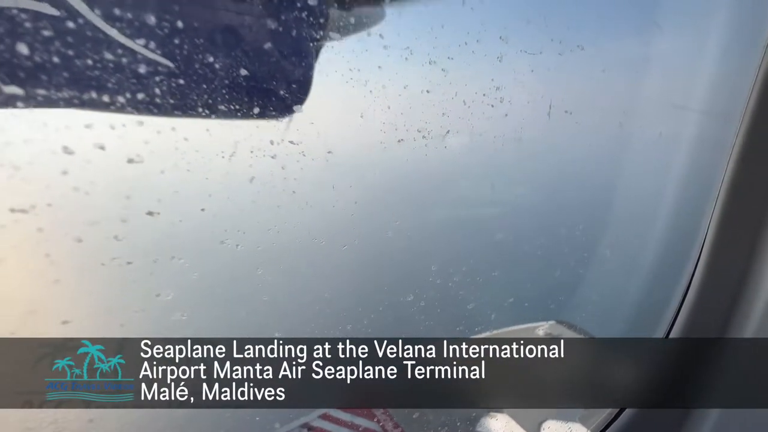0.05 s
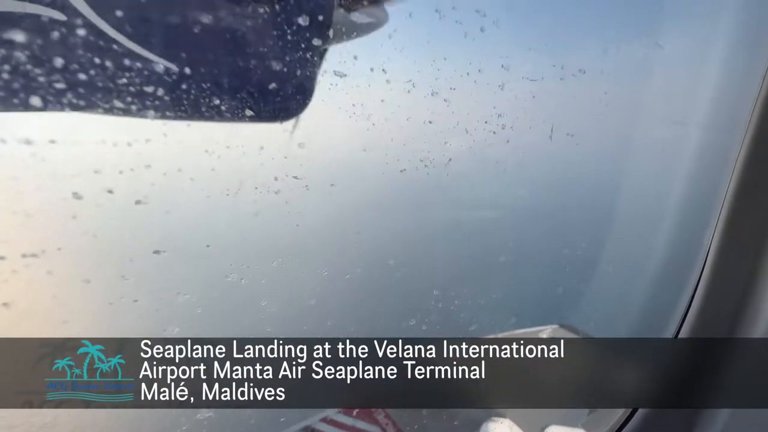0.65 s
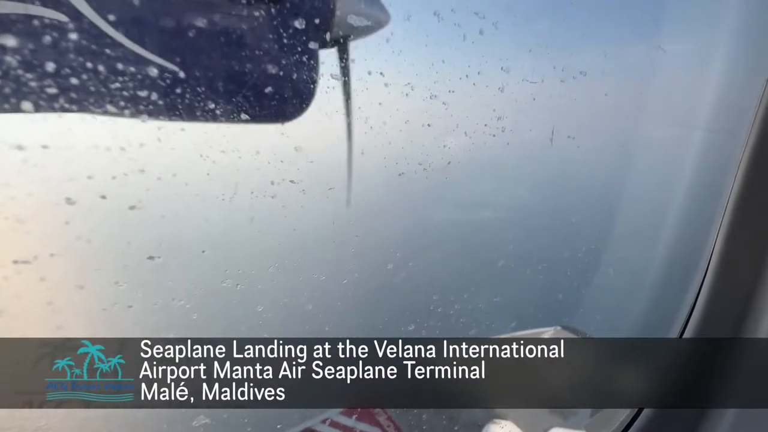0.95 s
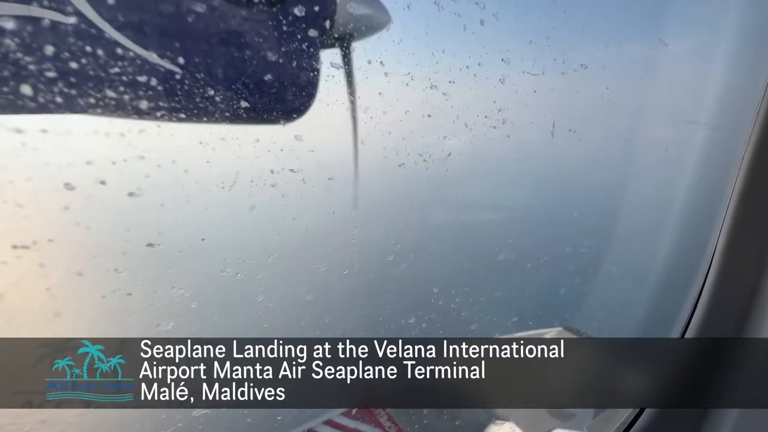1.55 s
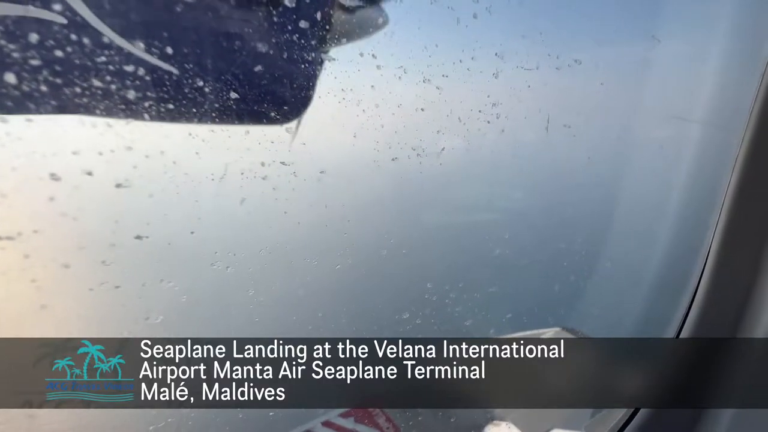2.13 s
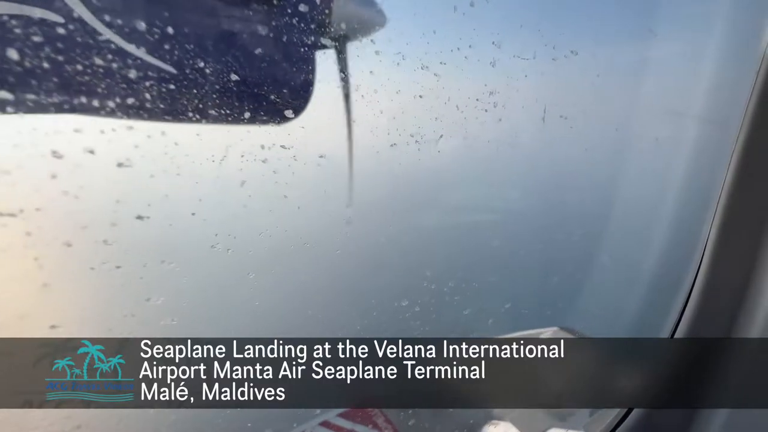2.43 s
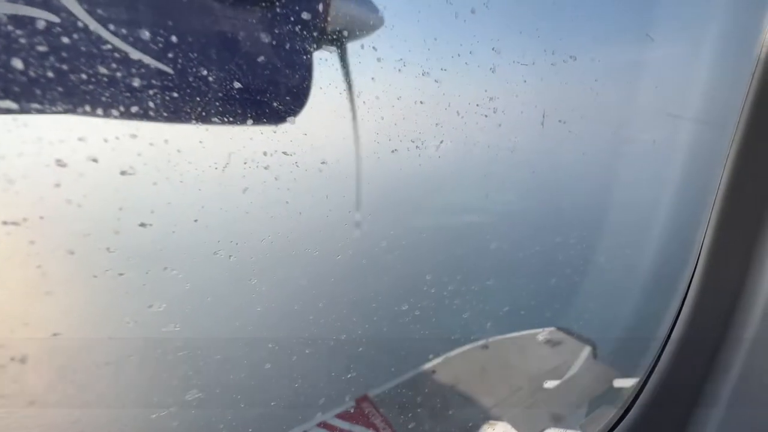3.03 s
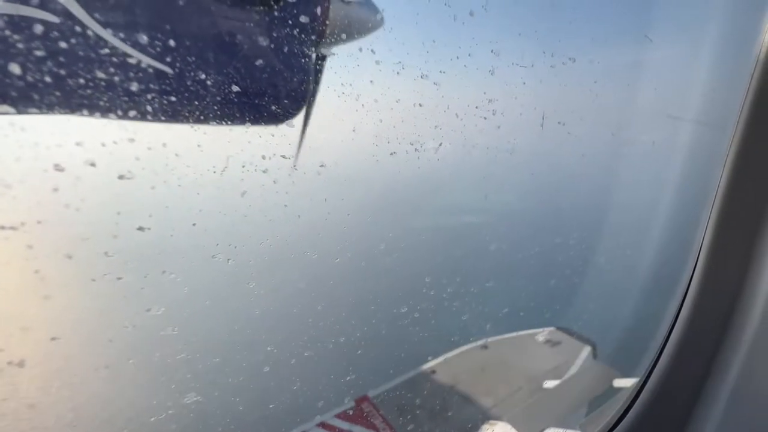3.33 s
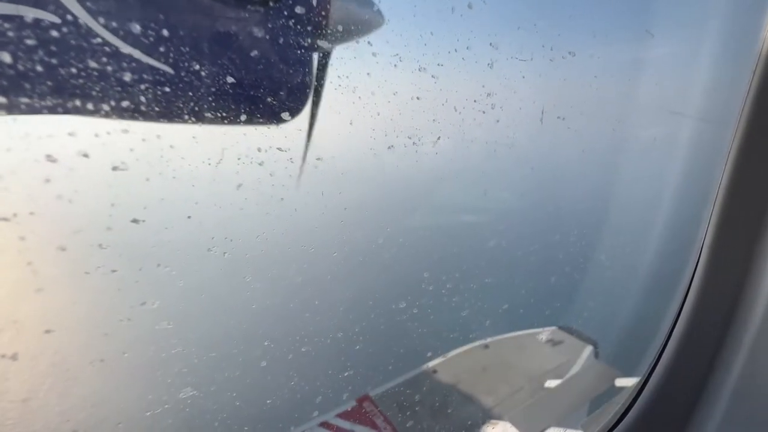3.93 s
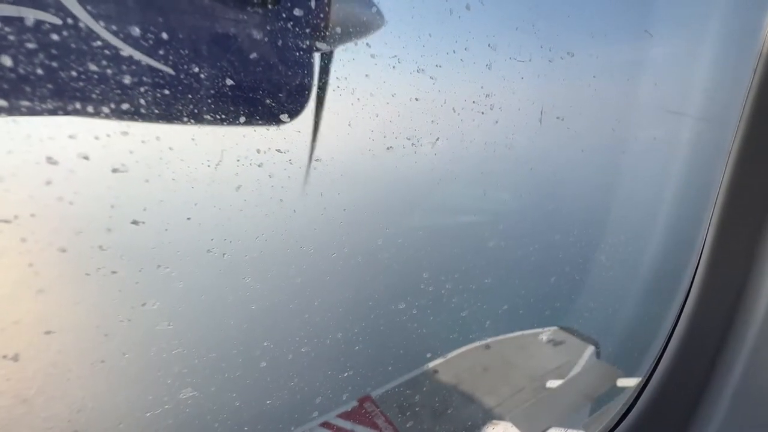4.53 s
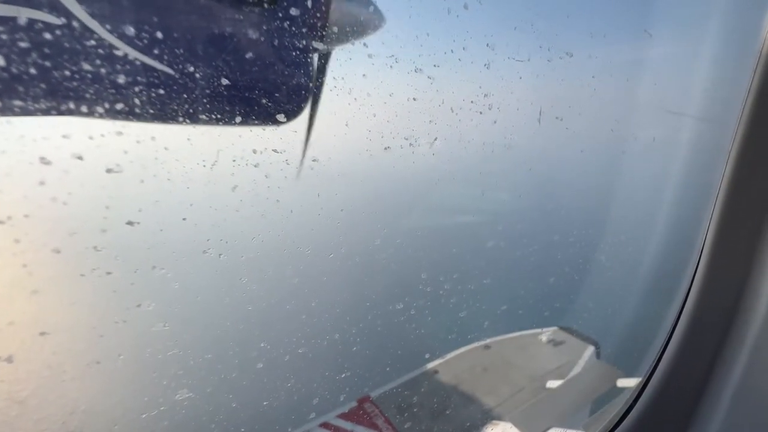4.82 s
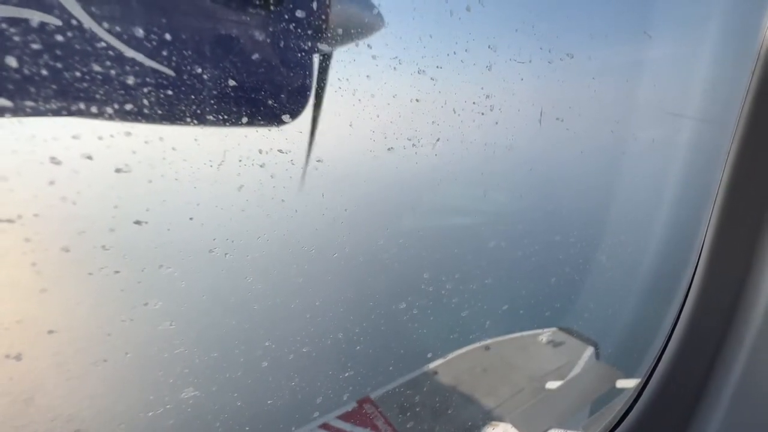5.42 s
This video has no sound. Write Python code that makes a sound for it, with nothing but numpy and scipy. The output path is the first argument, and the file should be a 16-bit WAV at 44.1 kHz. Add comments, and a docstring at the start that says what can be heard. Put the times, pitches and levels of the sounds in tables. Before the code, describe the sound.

Inside a seaplane in flight, close to a window, a deep propeller drone starts loud, its tones slowly swelling and sinking, a little stronger on the left. For the first second and a half, rough air buffets the cabin, short gusts surge against the window and loose trim buzzes in quick shakes. Two soft, dull knocks come from the airframe near 0.9 seconds, and one tiny tick at about 1.4 seconds. More soft knocks follow between 1.7 and 2.6 seconds, the strongest just after 2 seconds. Meanwhile the buffeting dies away and the drone eases. From about 3 seconds to the end, at around 5.5 seconds, the sound is quieter and steadier: the low drone, an even rush of passing air and a thin, high turbine whine, with a faint buzz of trim near 4.5 seconds and again at the close.

```python
"""Inside a turboprop seaplane in flight, at a window beside the propeller.
The blades load the fuselage periodically, giving a deep drone whose harmonics swell and sink as the
two propellers slip out of step. Turbulent air buffets the skin and dies away after two seconds,
leaving the drone, the even rush of the slipstream and a thin turbine whine. Loose trim buzzes,
gusts surge against the window, the airframe knocks softly and there is one tiny tick."""
import sys
import numpy as np
from scipy import signal
from scipy.fft import rfft, irfft, next_fast_len
from scipy.io import wavfile

SR = 44100
rng = np.random.default_rng(int(sys.argv[2]) if len(sys.argv) > 2 else 0)


def dump_mix(stems):
    """Bounce the given channels to the path in sys.argv[1] as a 16-bit WAV at rate SR."""
    frames = np.atleast_2d(stems).T  # one column per channel
    limited = np.clip(frames, -1, 1)  # hard clip at full scale
    pcm = np.round(limited * 32767).astype(np.int16)
    wavfile.write(sys.argv[1], SR, pcm)


N = 245637
TIME = np.arange(N) / SR
FREQS = np.fft.rfftfreq(N, 1 / SR)
BLADE_HZ = 84.87

# Blade load, high at first, then easing. Each row: time in seconds, first harmonic's level in dB.
BLADE_LOAD = [(0.08, -27.5), (0.5, -30.5), (0.87, -30.5), (1.4, -35.5), (1.67, -39.5), (2.25, -43.5),
              (3.1, -46.5), (4.55, -47), (4.85, -48.6), (5.5, -47)]
# Harmonics two to five, sinking where the propellers cancel. Each row: time in seconds, level in dB.
HARMONIC_2 = [(0, -22), (0.7, -24), (0.86, -21.5), (1.0, -24.5), (1.35, -25.5), (1.7, -31.5), (2.05, -33),
              (2.9, -39.5), (3.3, -40), (3.9, -43.5), (4.5, -50.5), (5.1, -41.5), (5.45, -38.5)]
HARMONIC_3 = [(0.08, -25), (0.2, -30), (0.35, -26), (0.6, -30.5), (0.85, -34), (1.15, -41), (1.5, -42),
              (1.68, -49), (1.9, -43.5), (2.55, -42.7), (2.85, -46.5), (3.2, -42.5), (4.35, -46),
              (4.95, -47.5), (5.13, -54.5), (5.4, -50.3)]
HARMONIC_4 = [(0.2, -51), (0.52, -43), (0.8, -50), (1.05, -41.5), (1.5, -50), (1.85, -50), (2.7, -67),
              (3.3, -63), (4.5, -56.5), (5.5, -67)]
HARMONIC_5 = [(0.1, -49), (0.7, -53), (1.05, -43), (1.55, -51), (2.0, -61), (2.6, -70), (3.1, -61),
              (3.9, -59), (4.7, -69), (5.4, -59)]
# Balance of the five lowest harmonics. Each entry: left minus right in dB.
HARMONIC_SIDES = [2.9, 2.0, 4.2, 7, 10]
# Harmonics from the sixth up. Each row: level against the first in dB, left minus right in dB.
UPPER_HARMONICS = [(-17, 12), (-27, 8), (-24, 6)]
# The drone leans as standing waves shift. Each row: time in seconds, added left minus right in dB.
STANDING_WAVE_LEAN = [(0, 0), (2.0, 1.2), (3.0, -0.5), (5.57, -1.5)]
# Sound field at the two microphone ports. Each row: frequency in Hz, coherence from 0 to 1,
# phase lead of the left in radians.
PORT_FIELD = [(30, .97, 0), (200, .98, -.05), (280, .96, .12), (400, .82, -.3), (520, .78, -2.3),
              (750, .8, -2.4), (1000, .5, -2.2), (1400, .27, -2.3), (2400, .27, -5.0), (3200, .38, -6.3),
              (5000, .2, -9.3), (9500, .2, -17.6), (12000, .92, -18.8)]
# Resonances and dips of pane and wall panels. Each row: centre in Hz, width in Hz, left and right dB.
PANEL_MODES = [(615, 70, -2, -2), (700, 90, 1, 3), (880, 60, -2, -2), (985, 50, 2, 2), (1065, 60, 2, 2.5),
               (1145, 60, -2.5, -1.5), (1285, 70, 2.5, 1), (1405, 45, -3.5, -2.5), (1456, 30, 2, 2),
               (1515, 60, -2.5, -1), (1640, 90, 4, 2), (1745, 35, 2.5, 2), (1810, 45, -3, -2),
               (2350, 50, -2.5, -1), (4960, 330, 5, 3)]
# Strength of the buffeting. Each row: time in seconds, relative level in dB.
BUFFET_LEVEL = [(0.08, -34), (0.55, -33.5), (1.0, -36), (1.3, -36.5), (1.5, -41.5), (2.1, -46.5),
                (2.71, -52.5), (5.08, -51), (5.5, -51.5)]
# Buffeting through the wall. Each row: frequency in Hz, left and right relative density in dB.
BUFFET_SPECTRUM = [(25, -79, -81), (61.4, -66, -70), (109, -56.5, -56), (149, -50.5, -61.5),
                   (193.5, -46.5, -49.5), (308, -50, -60.5), (460, -54.5, -67), (800, -60, -68.5),
                   (950, -79, -80), (1590, -72.5, -86), (2580, -85.5, -103.5), (4200, -91, -97),
                   (8700, -100.5, -110), (14000, -117, -118)]
# Strength of the slipstream and the turbine. Each row: time in seconds, relative level in dB.
RUSH_LEVEL = [(0.08, -56), (1.2, -58.5), (2.78, -63.5), (4.96, -64), (5.5, -63.5)]
# Slipstream through the wall. Each row: frequency in Hz, left and right relative density in dB.
RUSH_SPECTRUM = [(25, -104, -103), (51, -96.5, -103), (107, -78.5, -68.5), (221, -71.5, -63.5),
                 (305, -78.5, -76.5), (464, -69.5, -83.5), (674, -72.5, -78), (1096, -74.5, -78.5),
                 (2650, -89, -92.5), (3700, -91, -99.5), (5500, -99.3, -105.8), (8750, -95, -104),
                 (12930, -112, -112), (15000, -123, -123)]
# Turbine tones. Each row: frequency in Hz, level in dB added to RUSH_LEVEL.
TURBINE_TONES = [(2406, -15), (8280, -22), (9283, -20), (9367, -16), (9452, -19), (9535, -20.5)]
# Resonances of the trim between shakes. Each row: centre in Hz, width in Hz, relative level in dB.
TRIM_MODES = [(1260, 90, -10), (1633, 36, 8.5), (1810, 26, -8.5), (1885, 77, 7), (2270, 39, 4),
              (4800, 280, -15)]
# Shakes of the window trim. Each row: peak time in seconds, level in dB, length in seconds, pitch in Hz.
TRIM_SHAKES = [(.037, -44, .034, 1665), (.08, -45.5, .05, 1270), (.155, -42.3, .038, 1638),
               (.21, -50, .024, 1665), (.278, -45, .036, 1760), (.448, -49.5, .044, 1632),
               (.531, -47.5, .024, 1310), (.59, -49.5, .038, 1665), (.657, -46, .03, 1696),
               (.759, -52, .035, 1650), (.902, -44, .03, 1639), (1.192, -48.5, .022, 1290),
               (1.461, -54, .02, 1647), (4.48, -58, .03, 1640), (5.53, -60, .05, 1700)]
# Gusts on the window. Each row: peak time in seconds, level in dB, centre in Hz, length in seconds.
WINDOW_GUSTS = [(.047, -34.5, 700, .035), (.147, -31.5, 560, .022), (.177, -38.5, 690, .025),
                (.241, -38.5, 710, .022), (.297, -39, 700, .022), (.413, -38, 720, .022),
                (.45, -35, 580, .025), (.515, -33.5, 400, .04), (.556, -34, 470, .035),
                (.642, -34.3, 570, .026), (.697, -34.5, 640, .024), (.728, -34.5, 680, .024),
                (.774, -33.5, 690, .034), (.966, -34.5, 680, .02), (1.0, -34, 400, .04),
                (1.092, -36.5, 690, .04), (1.228, -34.2, 700, .04), (1.256, -35.5, 590, .025),
                (1.284, -35, 370, .022), (1.384, -37, 380, .024), (1.491, -35.5, 365, .02),
                (1.812, -38.5, 365, .028), (5.53, -52, 580, .08)]
# Dull blows on the airframe. Each row: start in seconds, level in dB, pitch in Hz.
AIRFRAME_BLOWS = [(.892, -23, 560), (.954, -24, 600), (1.675, -29, 400), (1.684, -27.5, 620),
                  (1.76, -30.5, 610), (1.868, -27, 365), (1.877, -32, 550), (2.054, -20, 560),
                  (2.062, -32, 450), (2.073, -29, 680), (2.086, -34, 560), (2.105, -32, 560),
                  (2.133, -35, 560), (2.249, -33, 345), (2.312, -29, 550), (2.321, -33, 360),
                  (2.407, -35, 335), (2.55, -34.5, 540)]
# Airframe modes. Each row: multiple of the blow's pitch, relative level in dB, seconds to fall 60 dB.
AIRFRAME_MODES = [(.72, -15, .05), (1, -1, .04), (1.2, -15, .045), (1.42, -20, .04)]
# The tick's impulse. It holds: time in seconds, level in dB before filtering.
TICK_IMPULSE = (1.4233, -28.7)
# Notches in the microphone's treble. Each row: centre in Hz, width in Hz, gain in dB.
MIC_NOTCHES = [(5220, 80, -9.5), (7580, 370, -11), (10940, 1180, -22)]


def from_db(db):
    """Amplitude grows tenfold for every 20 dB."""
    return 10 ** (np.asarray(db) / 20)


def rms_one(x):
    """Normalisation to unit mean power."""
    return x / np.sqrt(np.mean(x ** 2) + 1e-20)


def in_time(rows):
    """Linear interpolation of each column at every sample."""
    times, *columns = np.transpose(rows)
    return [np.interp(TIME, times, column) for column in columns]


def in_frequency(rows):
    """Interpolation of each column along a logarithmic frequency axis."""
    hz, *columns = np.transpose(rows)
    return [np.interp(np.log(FREQS + 1), np.log(hz), column) for column in columns]


def bell(hz, width_hz):
    """A Gaussian band of height 1, its width taken at half height."""
    return 2 ** -(2 * (FREQS - hz) / width_hz) ** 2


def swell(peak_s, db, length_s):
    """A Gaussian envelope, its length taken at half height."""
    return from_db(db) * 2 ** -(2 * (TIME - peak_s) / length_s) ** 2


def drift(rate_hz):
    """Low-passed noise of rms 1: a random fluctuation, mostly slower than rate_hz."""
    size = next_fast_len(N)
    rolloff = (1 + (np.fft.rfftfreq(size, 1 / SR) / rate_hz) ** 2) ** 2
    return rms_one(irfft(rfft(rng.standard_normal(size)) / rolloff, size)[:N])


def resonant_noise(response):
    """Random excitation of a frequency response; rms 1."""
    return rms_one(irfft(rfft(rng.standard_normal(N)) * response, N))


def wavering_tone(hz, wander_hz):
    """Random frequency modulation broadens a tone into a narrow band; rms 1."""
    return np.sqrt(2) * np.sin(2 * np.pi * np.cumsum(hz + wander_hz * drift(150)) / SR)


def pan(side_db):
    """A level difference, left minus right, places a source; the two gains average 1."""
    gains = from_db([[side_db / 2], [-side_db / 2]])
    return gains / gains.mean()


def at_ports(x, side_db):
    """Sound from the left wall reaches the right port weaker and shifted in phase."""
    _, lead = in_frequency(PORT_FIELD)
    right = irfft(rfft(x) * np.exp(-1j * lead), N)
    return np.array([x, right]) * pan(side_db)


def propeller(rough_db, flutter_db, smear_rad, stray_rad, growl_rad):
    """Periodic blade loading radiates harmonics of the blade rate; uneven inflow makes them waver."""
    load_db, = in_time(BLADE_LOAD)
    lean_db, = in_time(STANDING_WAVE_LEAN)
    blade_phase = 2 * np.pi * BLADE_HZ * TIME + .022 * drift(16)
    curves = (BLADE_LOAD, HARMONIC_2, HARMONIC_3, HARMONIC_4, HARMONIC_5)
    envelopes = [from_db(in_time(curve)[0] + rough_db * drift(48)) for curve in curves]
    envelopes += [from_db(load_db + db + flutter_db * drift(6.1)) for db, _ in UPPER_HARMONICS]
    sides_db = list(HARMONIC_SIDES) + [side_db for _, side_db in UPPER_HARMONICS]
    port_hz, _, leads = np.transpose(PORT_FIELD)
    out = np.zeros((2, N))
    for k, (envelope, side_db) in enumerate(zip(envelopes, sides_db), 1):
        # The cabin delays each harmonic differently, smearing the blade pulses into a round hum.
        dispersion = smear_rad * k * k + stray_rad * drift(0.17)
        inflow_jitter = growl_rad * (k - 1) * drift(35)
        port_lag = np.array([[0], [np.interp(k * BLADE_HZ, port_hz, leads)]])
        phase = k * blade_phase + dispersion + inflow_jitter - port_lag
        out += np.sqrt(2) * envelope * np.cos(phase) * pan(side_db)
    return out * from_db([lean_db / 2, -lean_db / 2])


def air_noise(spectrum):
    """Turbulence filtered by the resonant wall reaches the two ports partly coherent; rms 1."""
    coherence, lead = in_frequency(PORT_FIELD)
    left, independent = rfft(rng.standard_normal((2, N)))
    right = coherence * np.exp(-1j * lead) * left + np.sqrt(1 - coherence ** 2) * independent
    gain_db = np.array(in_frequency(spectrum))
    for hz, width_hz, left_db, right_db in PANEL_MODES:
        gain_db += bell(hz, width_hz) * np.array([[left_db], [right_db]])
    return rms_one(irfft(np.array([left, right]) * from_db(gain_db), N))


def buffeting(gain_db, lumps_db, patchy_db, eddy_hz, smooth_above_hz):
    """Large eddies modulate the low octaves, less as the air calms; small ones merge into hiss."""
    level_db, = in_time(BUFFET_LEVEL)
    spectrum = rfft(air_noise(BUFFET_SPECTRUM))
    lumpy_share = 1 / (1 + (FREQS / smooth_above_hz) ** 2)
    octave = np.log2(np.clip(FREQS, 125, 1000) / 125)
    common_db = lumps_db * drift(eddy_hz)
    unrest = (level_db - level_db.min()) / np.ptp(level_db)
    out = irfft(spectrum * (1 - lumpy_share), N)
    for k in range(4):
        band = irfft(spectrum * lumpy_share * np.maximum(0, 1 - abs(octave - k)), N)
        out += band * from_db(unrest * (common_db + patchy_db * drift(eddy_hz)))
    return from_db(level_db + gain_db) * rms_one(out)


def slipstream(gain_db, flicker_db):
    """Turbulent flow along the fuselage makes an even broadband rush."""
    level_db, = in_time(RUSH_LEVEL)
    return from_db(level_db + gain_db + flicker_db * drift(28)) * air_noise(RUSH_SPECTRUM)


def turbine(hiss_db, hiss_hz, hiss_width_hz, wander_hz, flutter_db):
    """Fast rotation gives thin tones, the top ones a blade rate apart in a band of compressor hiss."""
    level_db, = in_time(RUSH_LEVEL)
    hiss = irfft(rfft(rng.standard_normal((2, N))) * bell(hiss_hz, hiss_width_hz), N)
    out = from_db(hiss_db) * rms_one(hiss)
    for hz, db in TURBINE_TONES:
        phase = 2 * np.pi * np.cumsum(hz + wander_hz * drift(21)) / SR
        flutter = np.array([drift(17), drift(16)])
        out += from_db(db + flutter_db * flutter) * np.sin(phase)
    return from_db(level_db) * out * pan(2.4)


def trim_buzz(throb, idle_db, flutter_db, wander_hz, chatter_width_hz, chatter_db):
    """Forced vibration: loose trim rings faintly and chatters when shaken, pulsing at the blade rate."""
    blade_pulse = 1 + throb * np.cos(2 * np.pi * BLADE_HZ * TIME)
    modes = sum(from_db(db) * bell(hz, width_hz) for hz, width_hz, db in TRIM_MODES)
    out = resonant_noise(modes) * from_db(idle_db + flutter_db * drift(5.7))
    for peak_s, db, length_s, hz in TRIM_SHAKES:
        ring = wavering_tone(hz, wander_hz)
        rattle = from_db(chatter_db) * resonant_noise(bell(hz, chatter_width_hz))
        out += swell(peak_s, db, length_s) * (ring + rattle)
    return at_ports(out * blade_pulse, side_db=14.0)


def gusts(wander_hz, wash_width_hz, wash_db):
    """Each short surge excites a hollow resonance of the wall inside a broad wash of air."""
    wash_gain = from_db(wash_db)
    out = np.zeros(N)
    for peak_s, db, hz, length_s in WINDOW_GUSTS:
        ring = wavering_tone(hz, wander_hz)
        wash = wash_gain * resonant_noise(bell(hz, wash_width_hz))
        out += swell(peak_s, db, length_s) * (ring + wash)
    return at_ports(out / np.hypot(1, wash_gain), side_db=12.0)   # ring and wash add in power


def knocks(contact_s):
    """Free vibration: soft blows ring the airframe's damped modes at the pitch of the spot struck."""
    out = np.zeros(N)
    for start_s, blow_db, hz in AIRFRAME_BLOWS:
        age = np.maximum(TIME - start_s, 0)
        attack = 1 - np.exp(-age / contact_s)
        for multiple, mode_db, t60 in AIRFRAME_MODES:
            decay = from_db(blow_db + mode_db + rng.standard_normal() - 60 * age / t60)
            out += attack * decay * np.sin(2 * np.pi * multiple * hz * age)
    return at_ports(out, side_db=10.0)


def tick(dull_hz):
    """A low-passed impulse with no resonance is heard as one tiny, close snap."""
    start_s, db = TICK_IMPULSE
    impulse = from_db(db) * (np.arange(N) == int(start_s * SR))
    return signal.sosfilt(signal.butter(1, dull_hz, fs=SR, output="sos"), impulse) * pan(3.0)


def scene():
    """Superposition: drone, air, turbine and the small cabin noises add as pressures."""
    drone = propeller(rough_db=0.57, flutter_db=3.2, smear_rad=1.35, stray_rad=0.16, growl_rad=.08)
    roar = buffeting(gain_db=4.5, lumps_db=1.0, patchy_db=1.6, eddy_hz=32, smooth_above_hz=1100)
    surges = gusts(wander_hz=50, wash_width_hz=450, wash_db=1.0)
    rush = slipstream(gain_db=17.0, flicker_db=0.6)
    whine = turbine(hiss_db=-9.0, hiss_hz=9400, hiss_width_hz=600, wander_hz=3.0, flutter_db=3.5)
    trim = trim_buzz(throb=.45, idle_db=-69.3, flutter_db=2.5, wander_hz=32,
                     chatter_width_hz=650, chatter_db=-4)
    return drone + roar + rush + whine + trim + surges + knocks(contact_s=.002) + tick(dull_hz=11000)


def record(dry):
    """Linear filtering: the microphone notches the treble, and a steep low-pass cuts it at 15 kHz."""
    notches_db = sum(db * bell(hz, width_hz) for hz, width_hz, db in MIC_NOTCHES)
    coloured = irfft(rfft(dry) * from_db(notches_db), N)
    return signal.sosfilt(signal.ellip(10, .1, 80, 15000, fs=SR, output="sos"), coloured)


dry = scene()
out = record(dry)
dump_mix(out)
```